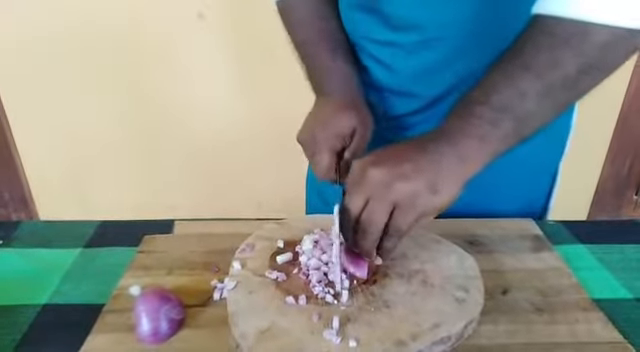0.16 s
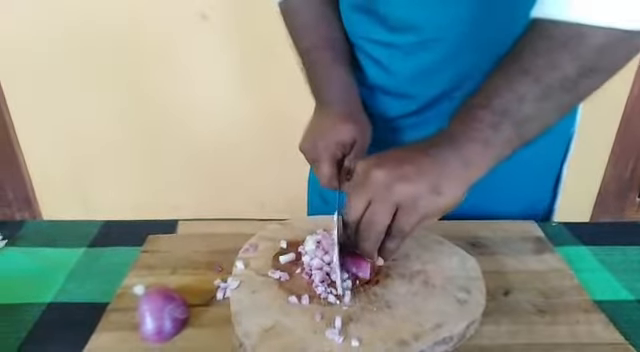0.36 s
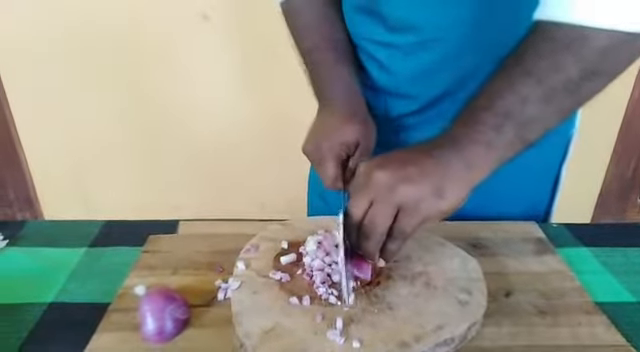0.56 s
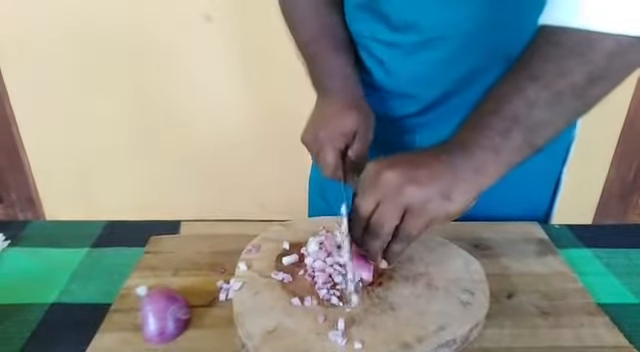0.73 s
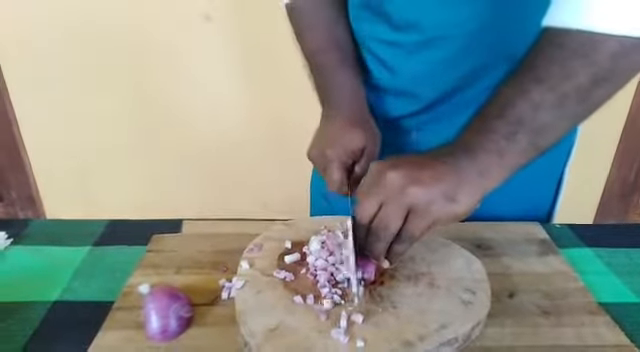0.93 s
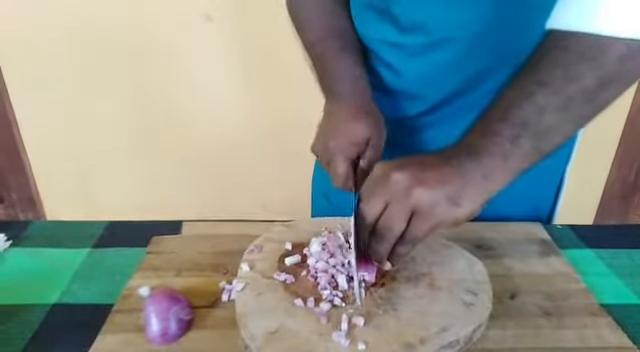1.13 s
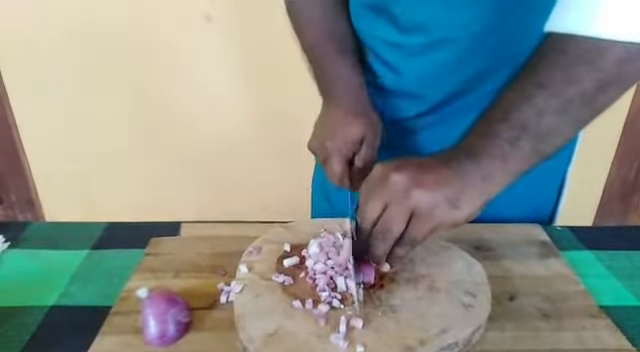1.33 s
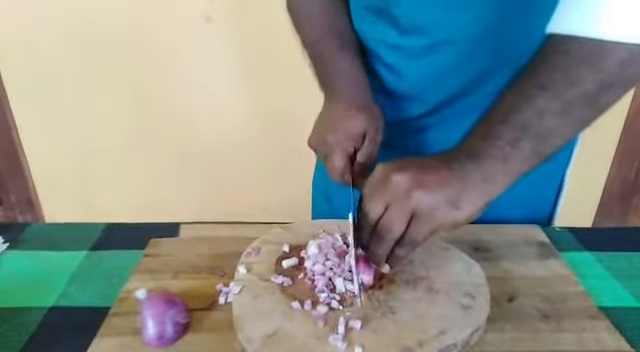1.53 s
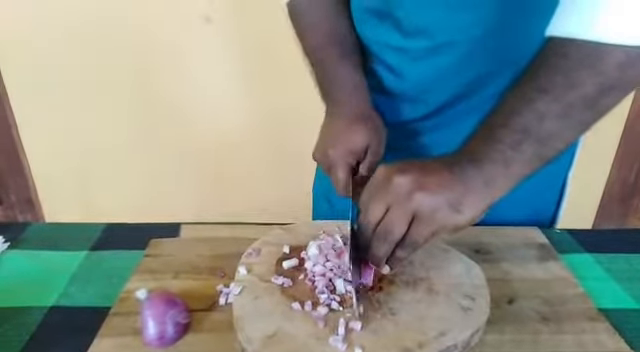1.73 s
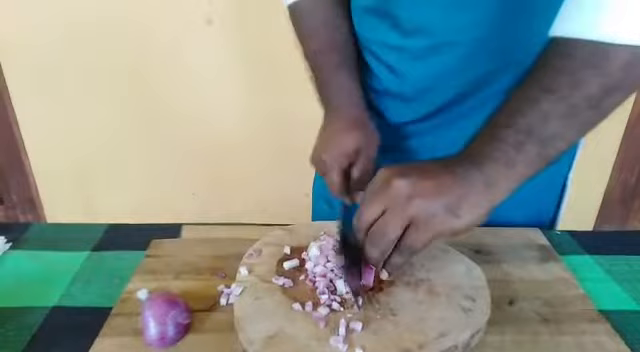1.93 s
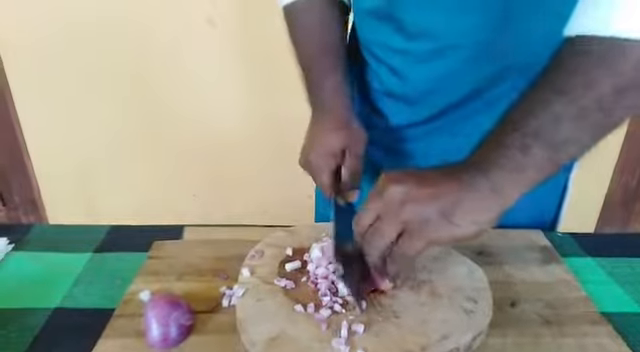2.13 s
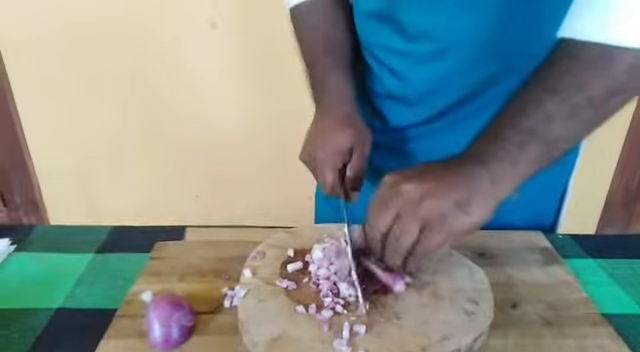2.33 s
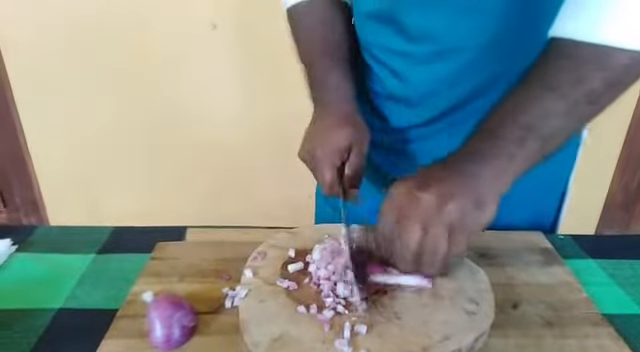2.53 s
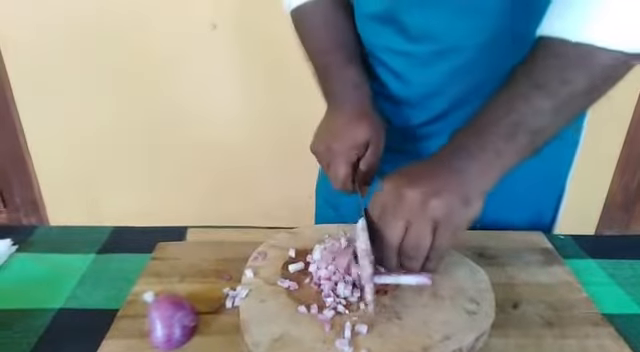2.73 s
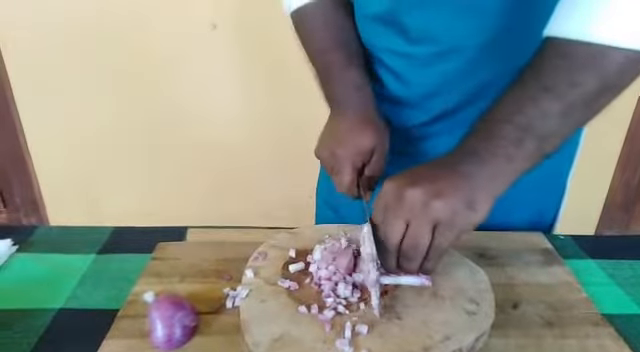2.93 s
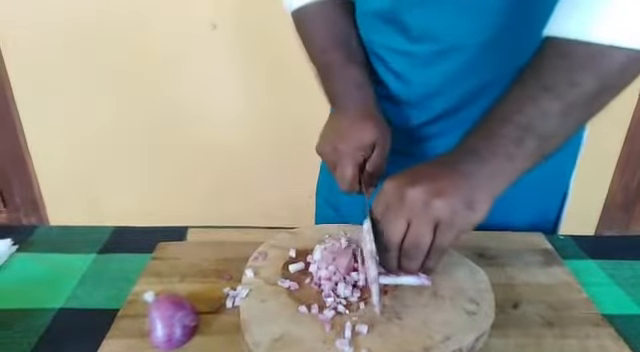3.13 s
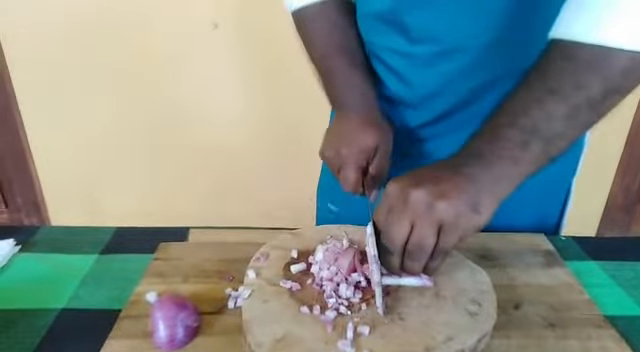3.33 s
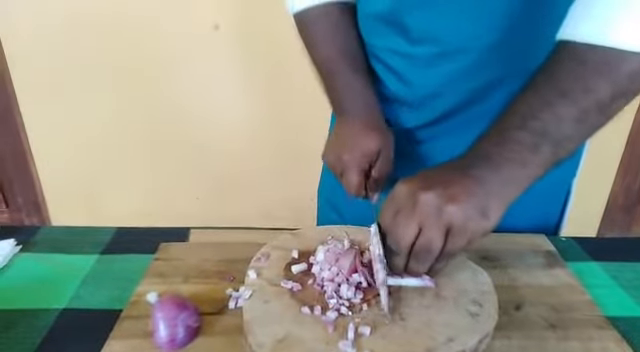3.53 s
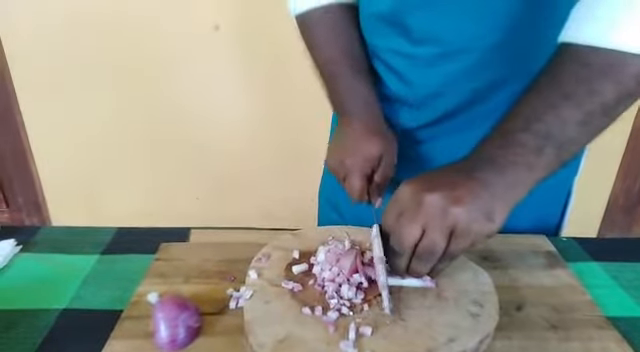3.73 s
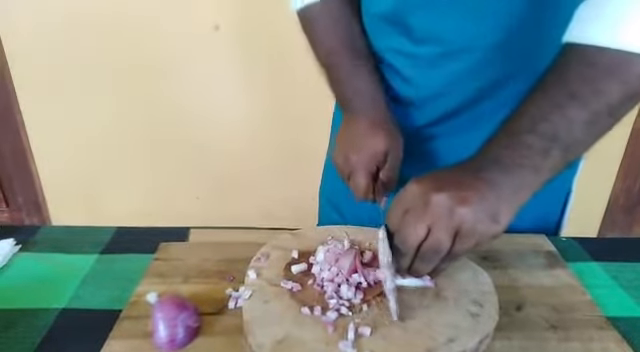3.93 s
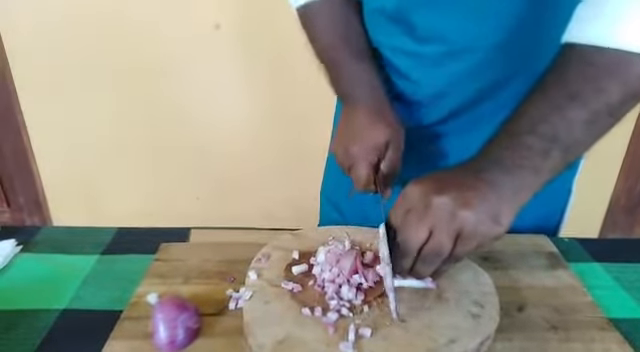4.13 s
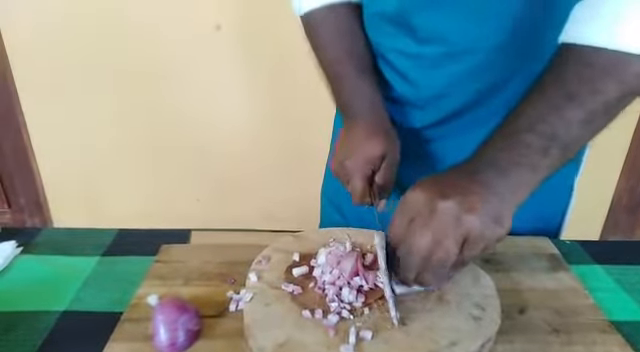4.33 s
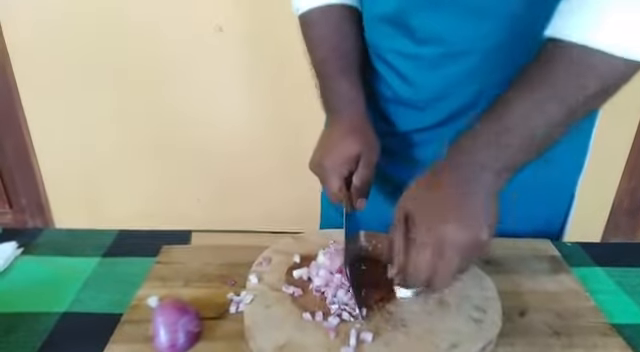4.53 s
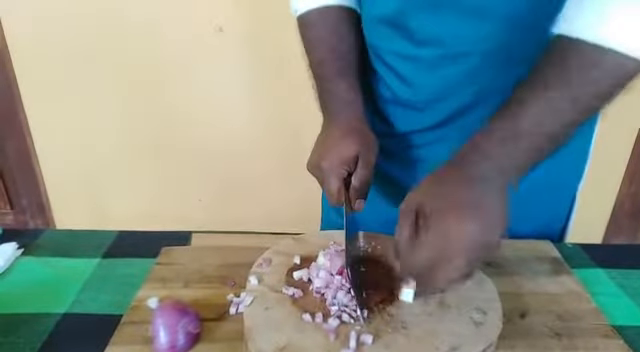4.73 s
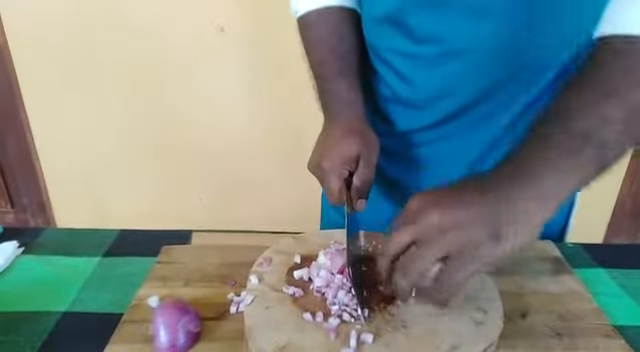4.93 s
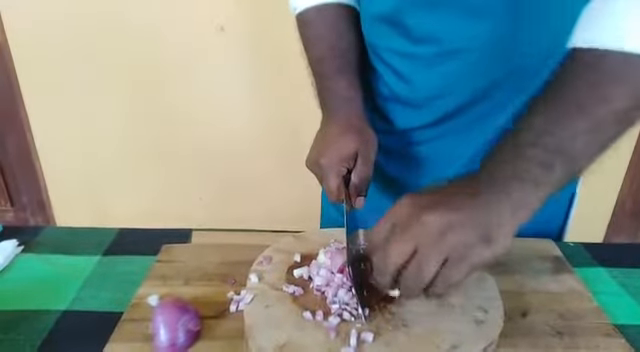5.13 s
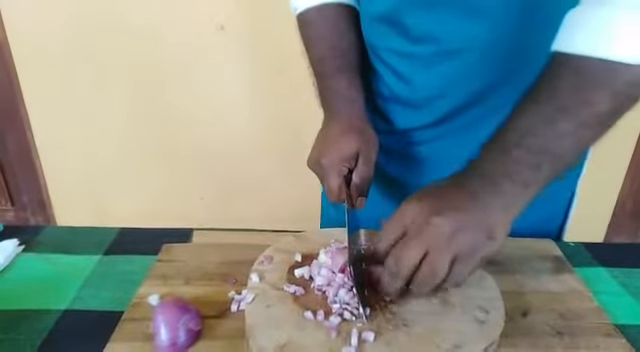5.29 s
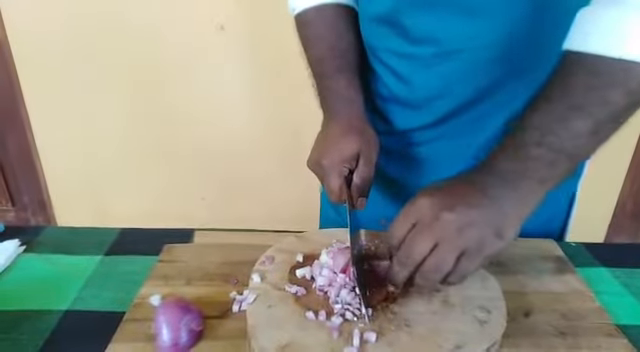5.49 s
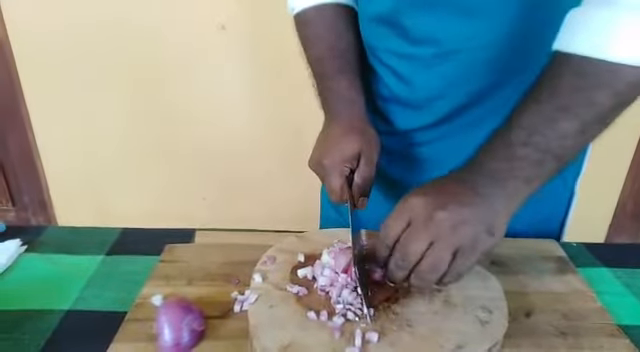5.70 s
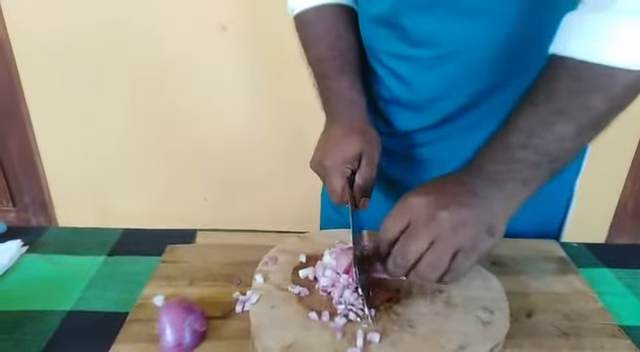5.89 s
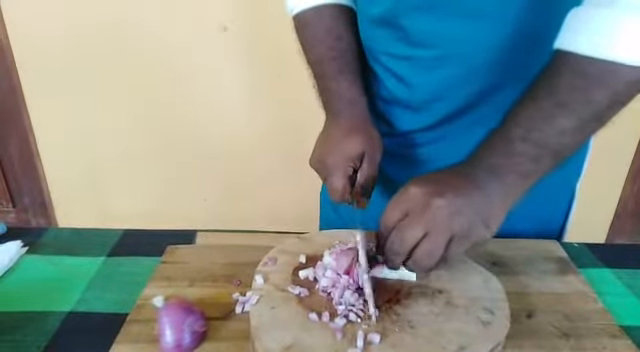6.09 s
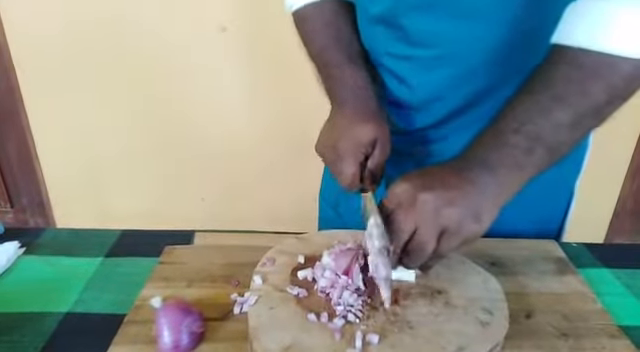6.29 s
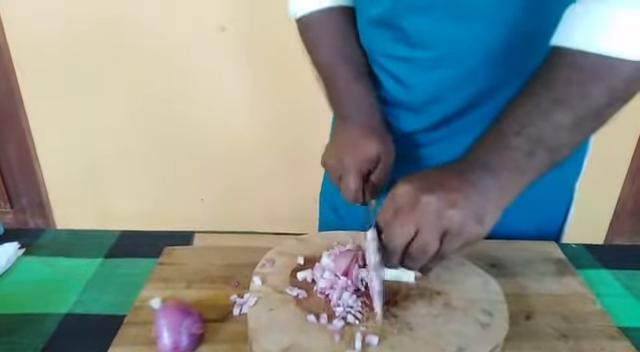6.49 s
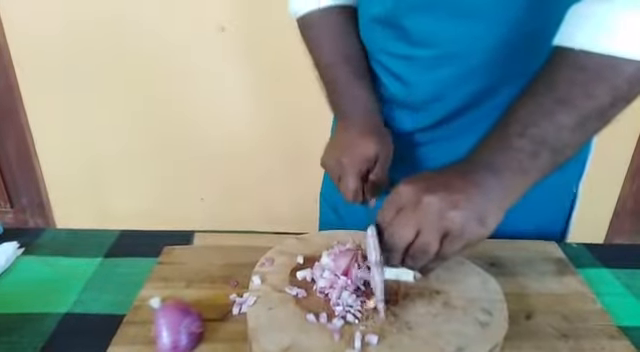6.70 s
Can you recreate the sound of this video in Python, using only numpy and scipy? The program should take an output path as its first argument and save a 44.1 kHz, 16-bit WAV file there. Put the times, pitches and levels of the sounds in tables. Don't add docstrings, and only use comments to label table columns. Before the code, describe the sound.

Sharp wooden knife knocks with juicy onion crunches come in two bursts, pause for faint rustling, then resume with two final chops.

```python
import sys
import numpy as np
from scipy import signal
from scipy.fft import rfft, irfft
from scipy.io import wavfile
from scipy.ndimage import uniform_filter1d

SR = 44100
rng = np.random.default_rng(int(sys.argv[2]) if len(sys.argv) > 2 else 0)


def put_to_file(sound):
    columns = np.atleast_2d(sound).T
    safe = np.clip(columns, -1, 1)
    whole_steps = np.round(safe * 32767)
    wavfile.write(sys.argv[1], SR, whole_steps.astype(np.int16))


def volts_from_decibels(level):
    exponent = np.asarray(level, float) / 20
    return 10 ** exponent


N = 297675

# (time [s], peak [dB], brightness [dB], table boom [dB], room send [dB])
CHOPS = [(0.422, -4, -42, -46.5, -2.4), (0.707, 2.5, -29, -37.5, -4.5), (1.011, 3.5, -23.5, -37, -1),
         (1.325, 0, -17.5, -38.5, -2.9), (1.843, -4.5, -13, -44.5, -0.05), (2.649, -15.5, -35.5, -55, 1),
         (3.042, 0, -15, -45, 0.8), (3.313, 1.05, -11.5, -39.5, 2.34), (3.532, -1.95, -17, -46, 0.85),
         (3.774, -0.74, -7.5, -43, 1.9), (4.006, 2, -17.5, -44, -1.5), (4.274, -0.94, -6.5, -38, 2),
         (4.601, -13, -53.5, -56, -0.9), (6.482, 1, -15, -40, -0.6), (6.726, -1.84, -5, -37.5, -6.5)]
# (time after first touch [ms], level [dB])
TOUCHES = [(0, 2), (0.499, -6), (1.101, -4.5), (1.698, -1.5), (2.298, -5.5), (2.9, -6.5), (3.6, -4)]
# (frequency [Hz], level [dB], t60 [s])
BLOCK_MODES = [(292.3, -17, 0.066), (444, -30, 0.0095), (699.6, -33.5, 0.0043), (832, -12, 0.018),
               (915.6, -0.73, 0.031), (1090, -6, 0.02), (1197, -1.5, 0.014), (1380, -3.5, 0.014),
               (1729, 1.5, 0.013), (1870, -2.5, 0.007), (2333, -1.5, 0.0077), (2448, -4, 0.015),
               (2790, -4, 0.0088), (3100, -6.5, 0.011), (3530, 0, 0.007), (3828, -7.5, .006),
               (4184, -5, 0.008), (4630, -6, 0.0082), (5230, -4.5, 0.011), (5685, -5, 0.0057),
               (6348, -16.5, 0.0033), (7700, -16.5, 0.0027), (8660, -11, 0.004)]
# (low [Hz], high [Hz])
DEAD_BAND_HZ = [400, 662]
# (frequency [Hz], level [dB], t60 [s])
TABLE_MODES = [(107.2, 1, .6), (155.3, -7, 0.66), (202, -3.5, 0.38), (244.5, -6.5, 0.32)]
# (start [s], end [s], start level [dB], end level [dB], wood share [dB])
CUTS = [(0.384, .423, -54, -30.5, 5.5), (.678, .702, -52, -22.5, -2.5), (0.976, 1.001, -44, -25, -7.5),
        (1.291, 1.317, -59.5, -19.5, -3.5), (1.805, 1.836, -42, -22.5, -7.5), (3.036, 3.042, -36, -23, -24),
        (3.283, 3.312, -52.5, -23, -13), (3.515, 3.535, -33, -34, -14.5), (3.75, 3.777, -38.5, -30, -11),
        (3.982, 4.003, -47.5, -27.5, -11.5), (4.245, 4.267, -65, -51, -8.5),
        (6.462, 6.487, -34, -26.5, -14.5), (6.708, 6.729, -28.5, -29, -16.5)]
# (start [s], length [s], start level [dB], change [dB])
BRUSHES = [
    (.125, .18, -60, -15.5),
    (2.163, .132, -54, -16.5),
    (2.508, .13, -51, -5),
    (2.657, .123, -59.5, -13),
    (4.46, 0.031, -47.5, 12.5),
    (4.63, .11, -46.5, -26),
    (5.106, 0.036, -76.5, -11.5),
    (5.37, .095, -58, -18),
    (5.912, 0.081, -63.5, -12.5),
]
# (time [s], peak [dB], pitch [Hz], t60 [s], wood share [dB])
SNAPS = [(0.3679, -34, 5500, 0.0584, -12), (0.6514, -16.5, 5720, 0.028, -18.5),
         (0.6582, -22, 6390, 0.028, 0.1), (0.9429, -12, 4570, 0.051, -25), (0.9589, -22, 3460, 0.06, -0.3),
         (1.2443, -17, 4047, 0.0801, -12), (1.2594, -33.5, 4207, 0.041, -33),
         (1.2774, -27, 4470, 0.02, -25), (1.2888, -15, 3630, 0.1, -2), (1.568, -20.5, 4390, 0.018, -27.5),
         (1.7414, -16, 3920, 0.033, -20.5), (1.7457, -19.5, 4320, 0.011, -2), (1.78, -24, 3620, 0.044, -12),
         (1.7859, -10, 4170, 0.023, -15.5), (3.031, -7, 3100, 0.016, -15.5),
         (3.2794, -17.5, 4830, 0.085, 2.5), (3.5135, -5.5, 4190, 0.0364, -14.5),
         (3.7501, -12.5, 3410, 0.0635, -3.5), (3.9834, -2, 4740, 0.017, -2), (4.2536, -23, 3365, 0.02, 2),
         (6.4677, -17, 3170, 0.026, -20)]
STRAINED_SNAPS = (1, 3, 5, 9, 10, 12, 14)
# (time [s], peak [dB], pitch [Hz])
CRUMBS = [(0.1245, -37.5, 5900), (2.164, -35.5, 5320), (2.1975, -35.5, 4960), (3.6589, -30.5, 4540),
          (4.1849, -39.5, 5520), (5.3737, -42.5, 9395), (5.6262, -49, 9230), (5.915, -47.5, 5920),
          (5.9493, -45, 6410)]
# (time [s], peak [dB])
TAPS = [(0.268, -64), (0.2797, -62), (0.311, -63)]
# (start [s], end [s], pitch [Hz], level [dB])
SQUEAKS = [
    (3.227, 3.276, 2030, -49),
    (3.424, 3.515, 5100, -54),
    (3.43, 3.484, 2580, -49.5),
]
# (frequency [Hz], density [dB per Hz])
FLESH_COLOUR = [(880, -41), (1500, -13), (2140, -21.5), (2780, -10), (3470, -2.5), (5510, -1.5), (7420, -5),
                (12600, -6), (14300, -16.5), (15000, -29)]
# (frequency [Hz], t60 [s])
KITCHEN_T60 = [(100, 0.11), (300, 0.5561), (900, 0.3474), (1400, 0.25), (2400, 0.26), (5000, 0.47),
               (12000, 0.91)]
# (frequency [Hz], level [dB])
KITCHEN_DB = [(250, -3.5), (520, -4), (750, 0.06), (950, 0.8), (2400, 2), (5000, -11.5), (7000, -11),
              (12000, -22)]
# (delay [s], level over the diffuse tail [dB])
WALL_ECHOES = [(0.0156, 9), (0.0228, -7.5), (.037, 7), (.056, 4)]
# (frequency [Hz], density [dB per Hz])
HISS_COLOUR = [(1470, -31), (2500, 0), (2700, -6.5), (4890, 5), (7520, -13), (8550, -0.5), (12500, -9.5),
               (14500, -13), (15200, -56)]
# (frequency [Hz], density [dB per Hz])
MURMUR_COLOUR = [(380, -22), (900, -10.5), (1400, -7.5), (2200, -3.5), (3500, -23.5)]
# (frequency [Hz], density [dB per Hz])
RUMBLE_COLOUR = [(15, -64), (25, -33), (60, -1.5), (113, -1), (129, -6), (146, 1.5), (205, -7), (248, -6.5),
                 (295, -11.5), (500, -49.5), (650, -77), (1100, -120)]
# (frequency [Hz], density [dB per Hz])
STILL_COLOUR = [(290, -53), (450, -8.5), (602, -12), (924, -15), (2240, -21), (4770, -13.5), (6170, -16.5),
                (12100, -15), (15200, -23.5)]
# (shut [dB], open [dB], opening [s], hold [s], closing [dB per s])
HISS_GATE = (-84, -59.5, 0.0034, 0.1953, 109.5)
MURMUR_GATE = (-79.5, -49.5, 0.1463, 0.0368, 111)
RUMBLE_GATE = (-59, -54, 0.62, -0.16, 39.5)
# (start [s], end [s], start pitch [Hz], end pitch [Hz], level [dB])
WHINES = [(2.1, 2.384, 1205, 1384, -72.5), (2.516, 2.65, 1242, 1168, -65.5),
          (2.546, 2.639, 1923, 1720, -56), (2.56, 2.65, 940, 908, -65), (2.849, 2.945, 630, 620, -76.5),
          (2.94, 3.008, 993, 1035, -70), (4.72, 5.025, 764, 780, -72.5), (5.2, 5.258, 1300, 1320, -80),
          (5.36, 5.403, 1330, 1327, -71), (5.418, 5.628, 1420, 1500, -71)]
# (frequency [Hz], left-right likeness [0..1])
AMBIENT_LIKENESS = [(60, 0.9), (180, 0.31), (540, 0.96), (1630, 1), (4900, 0.02), (14700, 0.034)]
# (frequency [Hz], left-right likeness [0..1])
CLOSE_LIKENESS = [(300, 0.76), (2000, 0.39), (12000, 1)]
# (frequency [Hz], left over right [dB])
PORT_DB = [(60, -1.5), (110, 0.5), (200, 0), (380, 2.0), (690, 0.5), (1280, -1), (2350, -1.5), (4340, 2),
           (7990, 2.5), (14700, -19.5)]
# (frequency [Hz], left lead [rad])
PORT_PHASE = [(0, 0.17), (700, -0.75), (1500, -1.2), (2700, -1.29), (4500, -1.39), (8000, -1.2),
              (15000, -2.1)]


def chops():
    time_s, peak_db, bright_db, boom_db, room_db = np.transpose(CHOPS)
    hollow_db = 5 + 0.25 * bright_db
    touch_ms, touch_db = np.transpose(TOUCHES)

    def touches(hz):
        shape = (len(time_s), len(touch_ms))
        jitter_ms = 0.3 * (touch_ms > 0) * rng.uniform(-1, 1, shape)
        times = time_s[:, None] + (touch_ms + jitter_ms) / 1000
        tilt_db = (bright_db + 12) * np.clip(np.log2(hz / 1200) / 2, 0, 1.5)
        tilt_db = tilt_db + hollow_db * np.exp(-(np.log2(hz / 1800) / 0.5) ** 2)
        uneven_db = 3.16 * rng.standard_normal(shape) + 1.5 * rng.standard_normal((len(time_s), 1))
        level_db = (peak_db + tilt_db - 13.5)[:, None] + touch_db + uneven_db
        return clicks(times.ravel(), volts_from_decibels(level_db.ravel()))

    wood = block(touches)
    boom = sum(ring(clicks(time_s + 0.0062, volts_from_decibels(boom_db + db + 6)), hz, t60_s)
               for hz, db, t60_s in TABLE_MODES)
    slow_start = signal.butter(2, [80, 250], "band", fs=SR, output="sos")
    stroke = np.searchsorted(time_s * SR - 99, np.arange(N)) - 1
    to_room = volts_from_decibels(room_db)[np.clip(stroke, 0, None)]
    return wood + signal.sosfilt(slow_start, boom), wood * to_room


def block(kicks_of):
    dead_leak = 0.35
    modes = sum(volts_from_decibels(db) * ring(kicks_of(hz), hz, t60_s) for hz, db, t60_s in BLOCK_MODES)
    notch = signal.butter(1, DEAD_BAND_HZ, "bandstop", fs=SR, output="sos")
    modes = dead_leak * modes + (1 - dead_leak) * signal.sosfilt(notch, modes)
    return signal.sosfilt(signal.butter(3, [170, 8000], "band", fs=SR, output="sos"), modes)


def tears():
    brush_wood_db, strain_wood_db = -26, -11
    strain_s, strain_below_db, strain_swell_db = 0.016, 24.5, 26.5
    strokes = [*CUTS]
    for start, length, db, change_db in BRUSHES:
        strokes.append((start, start + length, db, db + change_db, brush_wood_db))
    for k in STRAINED_SNAPS:
        snap_s, db = SNAPS[k][0], SNAPS[k][1] - strain_below_db
        strokes.append((snap_s - strain_s, snap_s, db - strain_swell_db, db, strain_wood_db))

    t, flesh, wood = np.arange(N) / SR, np.zeros(N), np.zeros(N)
    for start, end, start_db, end_db, share_db in strokes:
        near = slice(int((start - 0.01) * SR), int((end + 0.03) * SR))
        corners_s = [start - 0.01, start, end, end + 0.015, end + 0.03]
        corners_db = [start_db - 34.5, start_db, end_db, end_db - 22.5, end_db - 37.5]
        db = np.interp(t[near], corners_s, corners_db)
        flesh[near] = np.maximum(flesh[near], volts_from_decibels(db))
        wood[near] = np.maximum(wood[near], volts_from_decibels(db + share_db))

    clumps = volts_from_decibels(0.64 * drift(290, N))
    crunch = noise(FLESH_COLOUR, patchy_db=2.0, rate_hz=52, source=cell_bursts((2, 2, N)),
                   likeness=CLOSE_LIKENESS)
    push = rms_one(signal.lfilter([1], [1, -0.75], cell_bursts(N))) * wood * clumps
    return crunch * flesh * clumps + volts_from_decibels(-27.5) * block(lambda hz: push)


def cell_bursts(shape):
    burst = rng.random(shape) < 9000 / SR
    strength = volts_from_decibels(3 * np.minimum(rng.exponential(1, shape), 4))
    return burst * strength * rng.choice([-1, 1], shape)


def snaps():
    cracks = [*SNAPS]
    cracks += [(*crumb, 0.04016, -26.5) for crumb in CRUMBS]
    cracks += [(*tap, 2960, 0.02, 16) for tap in TAPS]
    out = np.zeros((2, N))
    spray = noise(FLESH_COLOUR, patchy_db=7.5, rate_hz=220, likeness=CLOSE_LIKENESS)
    t = np.arange(2600) / SR
    for time_s, db, hz, t60_s, _ in cracks:
        i = round(time_s * SR)
        span = slice(i, i + len(t))
        fall = np.minimum(t / 0.0015, 1) * volts_from_decibels(db - 60 * t / max(t60_s, 0.004))
        tone = 0.5 * np.sin(2 * np.pi * hz * t) * volts_from_decibels(-60 * t / 0.016)
        out[:, span] += fall * (0.34 * spray[:, span] + tone)
    time_s, peak_db, _, _, share_db = np.transpose(cracks)
    kicks = clicks(time_s + 0.0008, volts_from_decibels(peak_db + share_db - 21.5))
    knock = signal.lfilter([0.3], [1, -0.7], kicks)
    return out + block(lambda hz: knock)


def squeaks():
    return sum(narrow_band(start, end, hz, hz, db, width_hz=25, steady=2.5)
               for start, end, hz, db in SQUEAKS)


def kitchen(x):
    t = np.arange(int(0.8 * SR)) / SR
    swell = sum(volts_from_decibels(db) * (t > delay) * np.exp(-np.maximum(t - delay, 0) / 0.002)
                for delay, db in WALL_ECHOES)
    shape = np.clip((t - 0.004) / 0.0055, 0, 1) + swell

    def decay(hz):
        return volts_from_decibels(at_hz(KITCHEN_DB, hz) - 60 * t / at_hz(KITCHEN_T60, hz))

    tail = bands(rng.standard_normal((2, 2, len(t))), decay, AMBIENT_LIKENESS)
    return signal.fftconvolve(x[None], tail * shape, axes=1)[:, :N]


def background():
    time_s, peak_db, _, _, room_db = np.transpose(CHOPS)
    force_db = 1.4 * np.minimum(peak_db, 0)
    hiss_gain = gate(HISS_GATE, time_s, 1.7 * np.minimum(peak_db + 4, 0))
    murmur_gain = gate(MURMUR_GATE, time_s, force_db + 2.9 * room_db)
    rumble_gain = gate(RUMBLE_GATE, time_s, 0.23 * force_db)

    hiss = volts_from_decibels(2.5) * hiss_gain * noise(HISS_COLOUR, patchy_db=5.0, rate_hz=120)
    murmur = volts_from_decibels(-2.5) * murmur_gain * noise(MURMUR_COLOUR, patchy_db=3.0, rate_hz=45)
    low = signal.butter(6, 340, fs=SR, output="sos")
    rumble = signal.sosfilt(low, noise(RUMBLE_COLOUR, patchy_db=4.0, rate_hz=5.4))
    rumble = volts_from_decibels(1.0) * rumble_gain * rumble
    still = volts_from_decibels(-78 + 4.5) * noise(STILL_COLOUR, patchy_db=6.0, rate_hz=60)
    return hiss + murmur + rumble + whines() + still


def gate(setting, times, extra_db):
    shut_db, open_db, opening_s, hold_s, closing_db_per_s = setting
    coarse_s = np.arange(0, N, 64) / SR
    since = coarse_s - np.c_[times]
    swing_db = open_db + np.c_[extra_db] - shut_db
    opened_db = swing_db * np.clip(since / opening_s, 0, 1)
    opened_db = opened_db - closing_db_per_s * np.maximum(since - opening_s - hold_s, 0)
    widest_db = np.maximum(opened_db.max(axis=0), 0)
    return volts_from_decibels(shut_db + np.interp(np.arange(N) / SR, coarse_s, widest_db))


def whines():
    return sum(narrow_band(start, end, start_hz, end_hz, db, width_hz=0.086 * start_hz, steady=0)
               for start, end, start_hz, end_hz, db in WHINES)


def narrow_band(start, end, start_hz, end_hz, db, width_hz, steady):
    out = np.zeros(N)
    i, size = int(start * SR), int((end - start) * SR)
    turn = 2 * np.pi * np.cumsum(np.linspace(start_hz, end_hz, size)) / SR
    band = (steady + drift(width_hz, size)) * np.sin(turn) + drift(width_hz, size) * np.cos(turn)
    out[i:i + size] = volts_from_decibels(db) * np.sqrt(np.hanning(size)) * band
    return out


def noise(spectrum, patchy_db, rate_hz, source=None, likeness=AMBIENT_LIKENESS):
    if source is None:
        source = rng.standard_normal((2, 2, N))

    def flicker(hz):
        if not spectrum[0][0] < hz < spectrum[-1][0]:
            return 0
        return volts_from_decibels(at_hz(spectrum, hz) + patchy_db * drift(rate_hz, N))

    return rms_one(bands(source, flicker, likeness))


def bands(source, shape, likeness):
    out, edges = 0, 24 * 2 ** (np.arange(29) / 3)
    for k, (low, high) in enumerate(zip(edges, edges[1:])):
        hz = np.sqrt(low * high)
        gain = shape(hz)
        if np.max(gain) > 0:
            band = signal.butter(2, [low, high], "band", fs=SR, output="sos")
            mid, side = signal.sosfilt(band, source[k % 2])
            alike = np.clip(at_hz(likeness, hz), 0, 1)
            out = out + gain * (np.sqrt(1 + alike) * mid + np.sqrt(1 - alike) * side * [[1], [-1]])
    return out


def ring(kicks, hz, t60_s):
    r, w = volts_from_decibels(-60 / (t60_s * SR)), 2 * np.pi * hz / SR
    return signal.lfilter([0, np.sin(w)], [1, -2 * r * np.cos(w), r * r], kicks)


def clicks(times, gains):
    out = np.full(N, 1e-18)
    np.add.at(out, np.clip(np.round(np.asarray(times) * SR).astype(int), 0, N - 1), gains)
    return out


def drift(rate_hz, size):
    knots = rng.standard_normal(2000)
    return np.interp(np.arange(size) / SR * rate_hz, np.arange(len(knots)), knots)


def at_hz(points, hz):
    p = np.array(points, float)
    return np.interp(np.log(hz), np.log(np.maximum(p[:, 0], 1)), p[:, 1])


def rms_one(x):
    return x / np.sqrt(np.mean(x ** 2) + 1e-20)


def scene():
    direct, to_room = chops()
    onion = tears() + snaps()
    echo = volts_from_decibels(-39.5) * kitchen(to_room + volts_from_decibels(1.0) * onion[0])
    return direct + onion + squeaks() + echo + background()


def suppress(x):
    hz, _, bins = signal.stft(x, SR, nperseg=1024, noverlap=768)
    power = uniform_filter1d(np.mean(np.abs(bins) ** 2, axis=0), size=5, axis=1)
    quiet = np.percentile(power, 15, axis=1, keepdims=True)
    gain = np.clip(1 - volts_from_decibels(2.5) * quiet / (power + 1e-20), volts_from_decibels(-5.5), 1)
    gain[hz < 380] = 1
    return signal.istft(bins * gain, SR, nperseg=1024, noverlap=768)[1][:, :N]


def low_pass(x):
    return signal.sosfilt(signal.butter(12, 15330, fs=SR, output="sos"), x)


def record(dry):
    hz = np.maximum(np.arange(N // 2 + 1) * SR / N, 1)
    phase = np.interp(hz, *np.transpose(PORT_PHASE))
    difference = volts_from_decibels(at_hz(PORT_DB, hz)) * np.exp(1j * phase)
    ports = irfft(rfft(dry) * difference ** np.array([[0.5], [-0.5]]), N)
    rounded = 1.209 * np.tanh(ports / 1.477)
    top_cut = signal.cheby2(10, 55, 15200, fs=SR, output="sos")
    mix = np.clip(signal.sosfilt(top_cut, suppress(rounded)), -1, 1)
    return low_pass(mix)


dry = scene()
out = record(dry)
put_to_file(out)
```